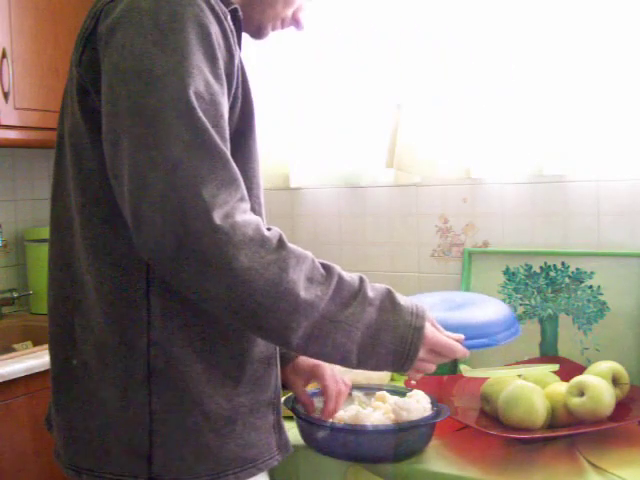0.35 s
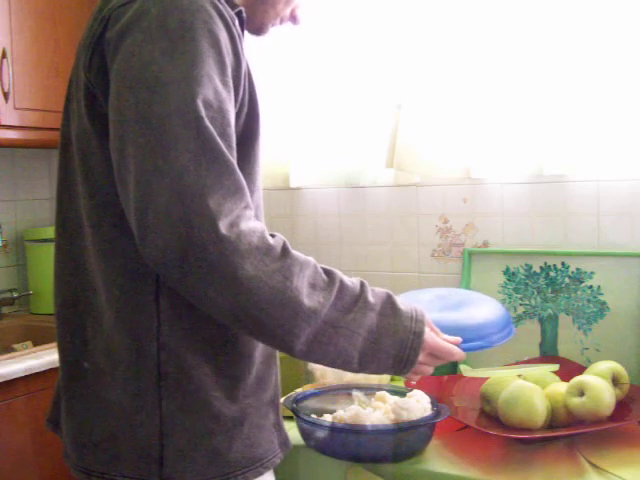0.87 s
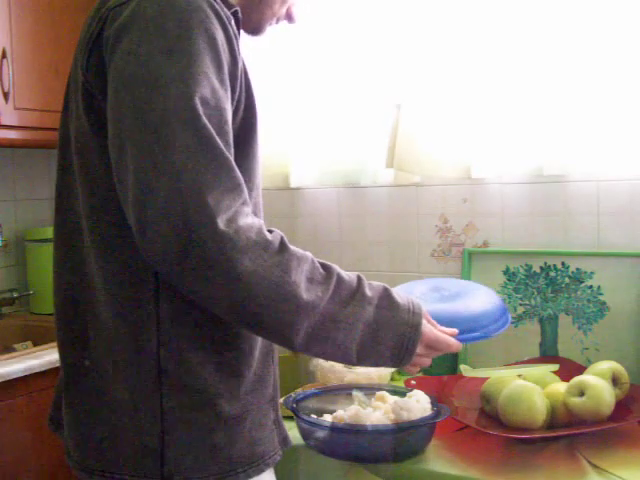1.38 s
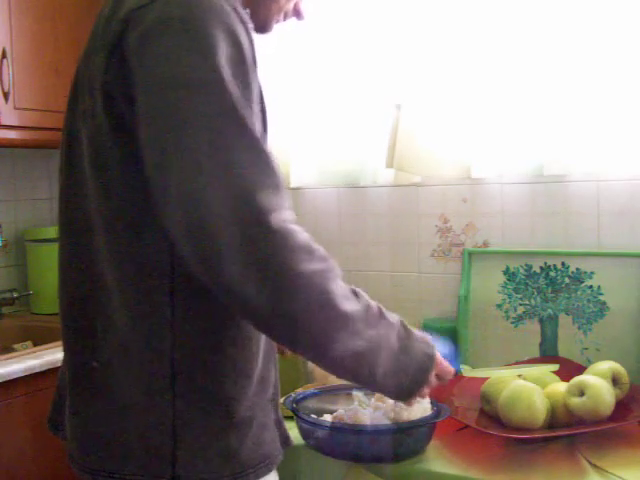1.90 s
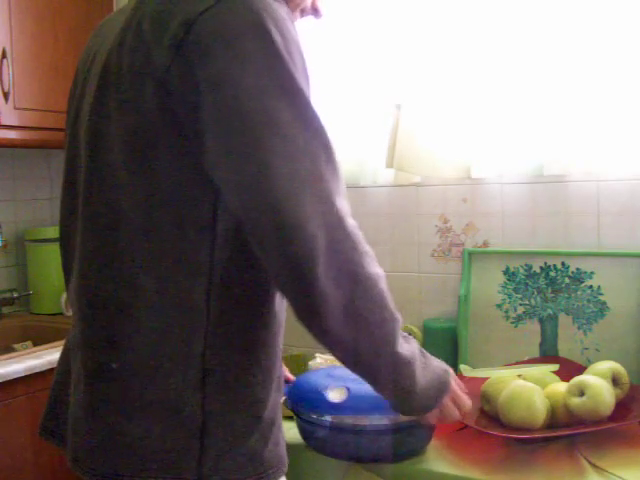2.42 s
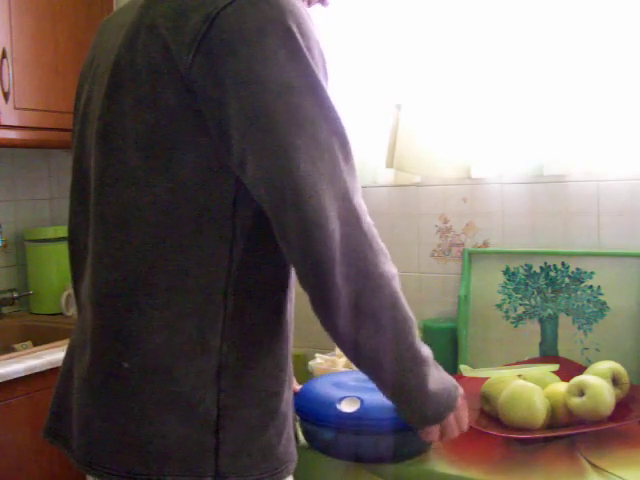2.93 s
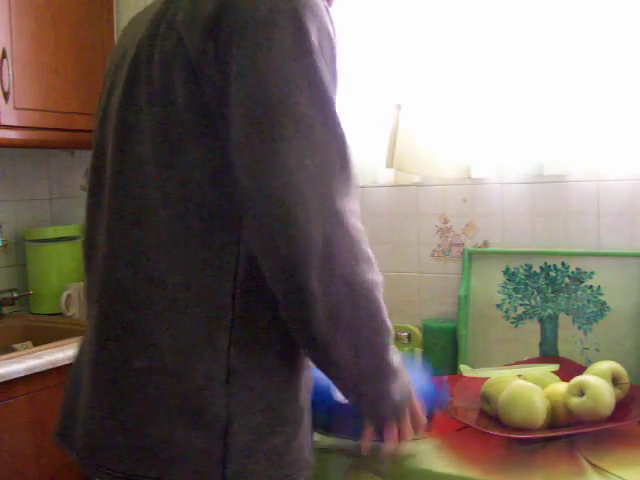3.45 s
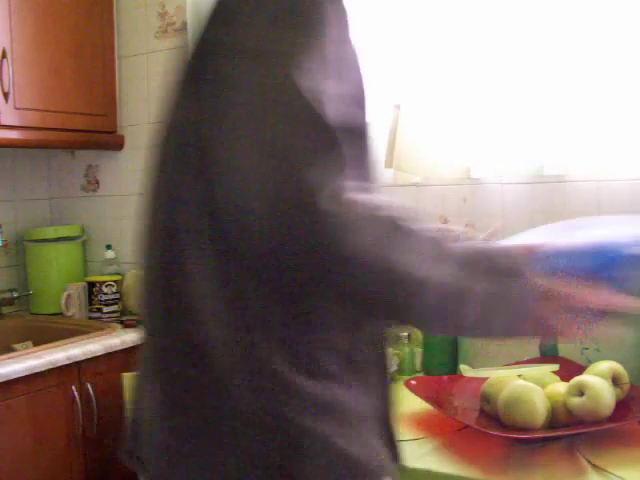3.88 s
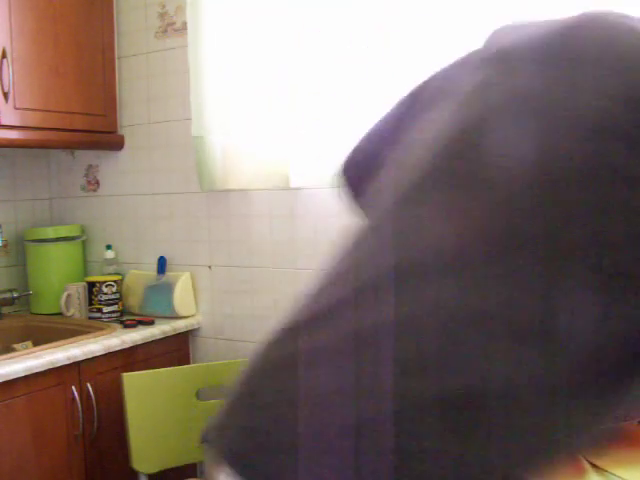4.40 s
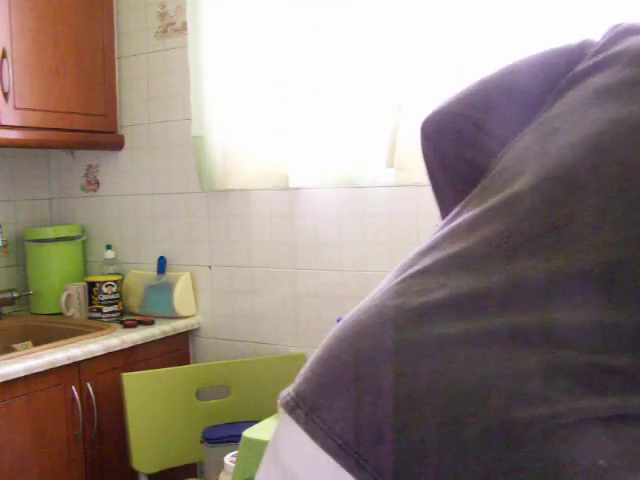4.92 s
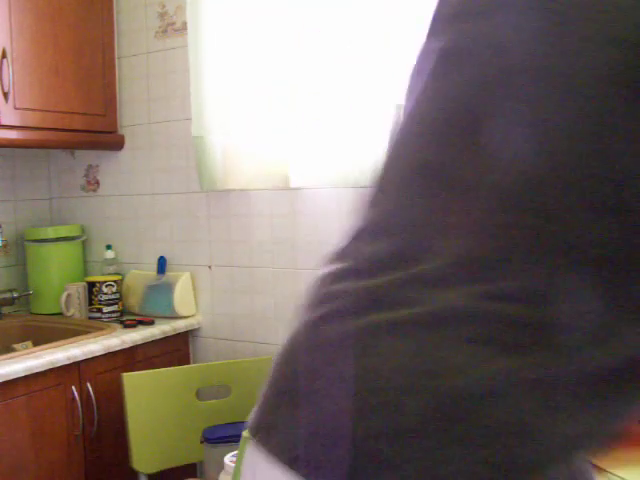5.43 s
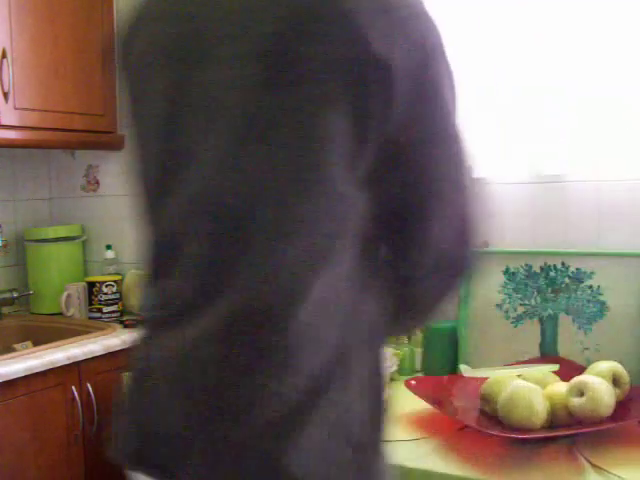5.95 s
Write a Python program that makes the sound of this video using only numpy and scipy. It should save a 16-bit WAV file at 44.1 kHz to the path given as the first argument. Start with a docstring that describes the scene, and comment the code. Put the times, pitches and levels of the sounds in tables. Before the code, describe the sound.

A wall clock ticks while a plastic lid snaps onto a bowl; cloth swishes, then the container drops with a loud, sharp clatter and rattle.

```python
"""Over a quiet floor a wall clock ticks each second; a plastic lid is pressed onto a bowl on a kitchen table,
then the bowl is carried off and dropped into a plastic box. Sleeves rustle and the bowl squeaks twice.
Blows and rubbing ring plastic modes, fibre clicks make the rustle, stick-slip the squeaks, gear shudder the ticks.
A tiled room rings; a small microphone with a dull top overloads on the hardest peaks."""
import sys
import numpy as np
from scipy import signal
from scipy.fft import rfft, irfft
from scipy.io import wavfile
from scipy.ndimage import uniform_filter1d

SR = 44100
rng = np.random.default_rng(int(sys.argv[2]) if len(sys.argv) > 2 else 0)


def pcm_store(signal):
    """Save signal as 16-bit PCM."""
    levels = np.round(np.clip(np.atleast_2d(signal), -1, 1) * 32767)
    wavfile.write(sys.argv[1], SR, levels.astype(np.int16).T)


def volts_from_db(level):
    """Convert decibel levels to linear amplitude ratios."""
    exponent = np.asarray(level, float) / 20
    return 10 ** exponent


N = 267422
T = np.arange(N) / SR

# blows on the plastic, levels relative within a column:
# start_s, hollow_thud_db, body_db, bright_crack_db, contact_scale (1 = 1.3 ms decay constant)
BLOWS = [(0.742, -37.5, -64, -64, 6.2), (1.08, -35.5, -63, -67, 22), (2.419, -23, -13.5, -16, 3),
         (2.537, -24, -25.5, -41, 15), (2.608, -31, -44, -25, 4.2), (2.639, -26, -21, -35.5, 6.6),
         (2.711, -40, -34.5, -20, 0.97), (2.792, -20.5, -30.5, -25, 4), (2.891, -17, -44, -41, 3.3),
         (3.184, -60, -45.5, -39.5, 3.2), (3.311, -31.5, -36, -47.5, 2.3), (3.327, -23.5, -39, -37.5, 6.3),
         (3.35, -32, -25.5, -36, 2.4), (3.731, -39.5, -46.5, -38, 6.6), (4.126, -46, -41, -33.5, 3.4),
         (4.167, -46, -32.5, -33, 8.9), (4.830, -13, -15.5, -8, 1.2), (4.844, -25, -34, -11.5, 0.7),
         (4.853, -36, -38, -29.5, 0.39), (5.008, -29, -29, -36, 2.8), (5.029, -18, -17.5, -6, 1.94),
         (5.036, -20, -25, -29, 3), (5.102, -38, -25, -22, 0.36), (5.129, -36, -26, -27, 0.61),
         (5.182, -35, -25, -36, 9), (5.236, -34, -31, -38.5, 0.89), (5.387, -47, -53, -42, 3.1),
         (5.669, -38.5, -46, -49.5, 19), (5.724, -63, -46.5, -39.5, 2.9), (5.765, -61, -41.5, -40.5, 1.4),
         (5.878, -64, -53, -44.5, 1.8), (5.999, -55, -35.5, -43, 13), (6.039, -55, -42, -40, 9.7)]
# presses, slides and jostles of the plastic; rise and fall are the times for 20 dB:
# peak_s, hollow_creak_db, bright_rattle_db, rise_s, fall_s
RUBS = [(2.429, -24.5, -28, 0.014, 0.033), (2.5, -35, -44, 0.093, .06), (2.549, -31.5, -41.5, 0.043, .03),
        (2.612, -33.5, -34.5, 0.0044, .05), (2.649, -25.5, -31, 0.036, 0.07),
        (2.727, -34, -30, 0.042, 0.028), (2.799, -34, -46, .02, 0.25), (2.89, -30.5, -49, 0.073, 0.086),
        (2.95, -27, -35.5, 0.074, 0.058), (3.089, -36, -53, .1, 0.06), (3.246, -59, -45.5, 0.27, 0.088),
        (3.33, -38, -42, 0.023, 0.06), (3.355, -32, -31.5, 0.018, 0.049), (3.959, -64, -34.5, 0.071, .07),
        (4.17, -47, -34.5, 0.077, .12), (4.37, -44, -36.5, 0.11, 0.088), (4.45, -52.5, -35.5, 0.085, 0.11),
        (4.843, -28.5, -28, 0.0069, 0.14), (4.889, -27, -32, 0.028, 0.034), (4.97, -56, -39.5, 0.13, .1),
        (5.022, -42, -31, 0.041, .04), (5.05, -31.5, -26, 0.029, 0.12), (5.102, -26.5, -23, 0.054, 0.098),
        (5.18, -46, -42, 0.054, 0.047), (5.223, -34, -36, 0.036, 0.12), (5.43, -52.5, -55, 0.13, 0.083)]


def unit(x):
    """Scale to rms 1."""
    return x / np.sqrt(np.mean(x ** 2))


def colour(x, points):
    """Shape a sound by (Hz, dB) points, straight in log frequency."""
    hz, db = np.transpose(points)
    f = np.maximum(np.fft.rfftfreq(len(x), 1 / SR), 1)
    gain_db = np.interp(np.log(f), np.log(hz), db, left=-90, right=-90)
    return irfft(rfft(x) * volts_from_db(gain_db), len(x))


def ring(x, hz, t60_s):
    """One decaying mode; an impulse of 1 rings with amplitude 1."""
    r = np.exp(-np.log(1000) / (t60_s * SR))
    w = 2 * np.pi * hz / SR
    return signal.lfilter([np.sin(w)], [1, -2 * r * np.cos(w), r * r], x)


def steady_norm(t60_s):
    """Level of a mode under steady noise; dividing by it evens long and short modes."""
    return np.sqrt(t60_s * SR / 28)


def grit(spread_db, share):
    """Tiny slips: a share of the samples carry a click of very uneven size."""
    size = volts_from_db(spread_db * rng.exponential(size=N))
    return unit(rng.standard_normal(N) * size * (rng.random(N) < share))


def walk(rate_hz):
    """Random levels joined by ramps 1 / rate_hz long; spread near 1."""
    hold = int(SR / rate_hz)
    steps = np.repeat(rng.standard_normal(N // hold + 1), hold)
    return 1.2 * uniform_filter1d(steps, hold)[:N]


def swells(rows, t=T):
    """Gain of summed swells (peak_s, level_db, rise_s, fall_s); rise and fall are the times for 20 dB."""
    rise_bend, fall_bend = 1.28, 1.09  # over 1 rounds the top and steepens the foot
    total = 0
    for peak_s, db, rise_s, fall_s in rows:
        before = (np.abs(peak_s - t) / rise_s) ** rise_bend
        after = (np.abs(t - peak_s) / fall_s) ** fall_bend
        total = total + volts_from_db(db - 20 * np.where(t < peak_s, before, after))
    return total


def strike(starts_s, gains, contact_scales):
    """Contacts rise quickly and die away over their contact time; the gain sets the energy."""
    x = np.zeros(N)
    for start_s, gain, scale in zip(starts_s, gains, contact_scales):
        t = np.arange(int(0.0087 * scale * SR)) / (0.0013 * scale * SR)
        shape = (1 - np.exp(-t / 0.24)) * np.exp(-t)
        at = int(start_s * SR)
        x[at:at + len(t)] += (gain * shape / np.sqrt(np.sum(shape ** 2)))[:N - at]
    return x


def plastic_modes():
    """Blows and rubbing excite the same modes; every blow lands on another spot and stirs another mix."""
    # modes of the plastic: pitch_hz, level_db, t60_s
    modes = [(130.8, -7.5, 0.17), (165.3, 0, 0.047), (210.6, -8.5, 0.13), (245, -4, 0.12),
             (286.6, -6, 0.062), (331.5, -7.5, 0.068), (393.3, -2, 0.058), (449.5, -5, 0.12),
             (490, -2, 0.058), (577.5, 1, 0.046), (675, -8, 0.052), (770, -3, 0.016), (901.5, -10, 0.045),
             (1034, -3.5, 0.019), (1118, -6, 0.017), (1265, -5.5, 0.0089), (1398, -9.5, 0.02),
             (1635, -1.5, 0.007), (1874, -5, 0.015), (2100, -5.5, 0.015), (2378, -4, 0.011),
             (3034, -1.5, 0.0047)]
    # pitch of the air hollow in whatever is being handled: time_s, pitch_hz
    hollow = [(.74, 517), (1.08, 245), (2.4, 530), (2.56, 483), (2.62, 372), (2.72, 363), (2.8, 302),
              (2.95, 206), (3.09, 344), (3.31, 190), (3.36, 450), (3.45, 300), (3.9, 350), (3.97, 500),
              (4.17, 500), (4.36, 396), (4.9, 394), (5.15, 397), (5.25, 285), (5.67, 490)]
    # weight coming down on table, floor and box: peak_s, level_db, rise_s, fall_s
    booms = [(2.694, -39.5, .1, 0.04), (2.83, -27, .06, .08), (2.944, -28.5, .05, 0.087),
             (3.116, -35.5, 0.11, .08), (3.325, -24.5, 0.024, .04), (3.36, -27, .03, 0.069),
             (4.168, -35, .03, 0.059), (4.258, -40, 0.062, 0.3), (4.852, -15, .015, 0.029),
             (4.89, -23.5, 0.025, .06), (5.03, -26, 0.073, .1), (5.155, -22, 0.052, 0.064),
             (5.213, -30.5, 0.037, 0.047)]
    boom_top_hz, hollow_top_hz = 150, 720
    hollow_fall_db_per_octave = 13
    scrape_db = -11  # relative to the mean of creak and rattle

    start_s, thud_db, body_db, _, contact_scale = np.transpose(BLOWS)
    spot = rng.standard_normal((len(start_s), len(modes)))
    hollow_s, pitch_hz = np.transpose(hollow)
    hollow_hz = np.exp(np.interp(T, hollow_s, np.log(pitch_hz)))
    creak = swells([(s, low, rise, fall) for s, low, _, rise, fall in RUBS])
    scrape = swells([(s, (low + top) / 2 + scrape_db, rise, fall) for s, low, top, rise, fall in RUBS])
    out = 0
    for k, (hz, db, t60_s) in enumerate(modes):
        if hz < hollow_top_hz:
            # the enclosed air favours the low modes near its own pitch
            away_db = hollow_fall_db_per_octave * np.abs(np.log2(hz / hollow_hz))
            hit_db = thud_db - np.interp(start_s, T, away_db)
            rub = swells(booms) if hz < boom_top_hz else creak * volts_from_db(-away_db)
        else:
            hit_db, rub = body_db + 5.5, scrape
        blows = strike(start_s, volts_from_db(hit_db + 2.3 * spot[:, k]), contact_scale)
        blows = blows * np.sign(rng.standard_normal(N))
        rubbing = rub / steady_norm(t60_s) * grit(spread_db=2.1, share=.5)
        out = out + volts_from_db(db) * ring(blows + rubbing, hz, t60_s)
    return out


def plastic_crackle():
    """Above its clear modes the plastic rings too densely to tell tones apart: shaped noise and clicks."""
    # spectrum of the dense ringing: pitch_hz, level_db (per Hz)
    crack_spectrum = [(500, -12.5), (1200, -18), (2200, -9.5), (3400, 1), (4800, 3.5), (6500, -3.5),
                      (9000, -7.5), (12000, -35.5)]
    start_s, _, _, crack_db, contact_scale = np.transpose(BLOWS)
    cracks = strike(start_s, volts_from_db(crack_db + 22.0), contact_scale) * np.sign(rng.standard_normal(N))
    rattle = swells([(s, top, rise, fall) for s, _, top, rise, fall in RUBS])
    rattle = rattle * volts_from_db(3.0 * walk(150)) * grit(spread_db=2.5, share=0.35)
    return volts_from_db(4.0) * colour(cracks + rattle, crack_spectrum)


def plastic():
    """Small light things move little air in the deep bass, so the sum is high-passed."""
    high_pass = signal.butter(4, 68, "high", fs=SR, output="sos")
    return signal.sosfilt(high_pass, plastic_modes() + plastic_crackle())


def squeak():
    """Slightly uneven stick-slip that speeds up a little: a fundamental with three overtones."""
    # a foot of the bowl drags: peak_s, level_db (before overtone levels), rise_s, fall_s, slip_rate_hz (at peak)
    squeaks = [(3.635, -51, 0.031, 0.088, 593.6), (4.172, -47, 0.064, .025, 784)]
    slip_hz_per_s = 150
    harmonics_db = (7.0, 2.0, 1, 3.5)
    out = 0
    for peak_s, db, rise_s, fall_s, hz in squeaks:
        slip_hz = (hz + slip_hz_per_s * (T - peak_s)) * (1 + 0.016 * walk(300))
        phase = 2 * np.pi * np.cumsum(slip_hz) / SR
        tone = sum(volts_from_db(d) * np.sin((k + 1) * phase) for k, d in enumerate(harmonics_db))
        out = out + swells([(peak_s, db, rise_s, fall_s)]) * volts_from_db(2.8 * walk(120)) * tone
    return out


def rustle():
    """Cloth fibres slip in dense tiny clicks, flickering in level."""
    # sleeves rubbing: peak_s, level_db, rise_s, fall_s
    rubs = [(1.74, -50.5, 0.068, 0.11), (1.85, -54, 0.094, .06), (2.31, -32.5, 0.17, .2),
            (3.645, -43, 0.23, .08), (3.715, -43.5, 0.062, 0.091), (3.93, -43, 0.16, .12),
            (4.128, -41.5, .006, .1), (4.35, -29, .12, 0.13), (4.42, -28.5, .1, .18), (4.7, -55, 0.12, .3),
            (5.5, -51, .2, .6), (5.73, -52.5, 0.19, .4), (6.03, -42.5, 0.16, .1)]
    # spectrum of the fibres: pitch_hz, level_db (per Hz, relative)
    cloth = [(120, -30), (200, -12.5), (390, -2), (430, 0.5), (465, -10), (908, -21.5), (1500, -16),
             (2050, -7), (2800, -8.5), (3500, -1.5), (4540, 2), (7090, -5), (9000, -8), (11700, -48),
             (19800, -120)]
    fibres = unit(colour(grit(spread_db=1.5, share=0.23), cloth))
    return swells(rubs) * volts_from_db(0.83 * walk(40)) * fibres


def clock():
    """Every second the gear train shudders, rattles and rings the case; starts 1 s ahead of the scene."""
    # modes of the case: pitch_hz, level_db (relative), t60_s
    case_modes = [(500, -4, 0.1), (598, -1, 0.072), (732, 0, 0.12), (1216, -5, 0.041), (1440, -4, 0.028),
                  (1950, -2.5, 0.029), (2070, -11.5, 0.056), (2750, -8, 0.0083), (3150, 6.5, 0.0067),
                  (3790, -2, 0.079), (4250, 2.5, 0.033), (4580, -1.5, 0.0082), (5080, 2, 0.025),
                  (5580, 6, 0.008), (6190, -3.5, 0.037), (6400, 3, 0.017)]
    # broad rattle of the case: pitch_hz, level_db (per Hz, relative)
    case_rattle = [(1200, -31), (1800, -4), (3000, -0.5), (6300, -3), (7000, -9), (9000, -7.5)]
    peak_s = .966  # within each second
    shudder_db, rise_s, fall_s = -32, 0.022, 0.038
    t = np.arange(-SR, N) / SR
    shudder = swells([(peak_s + k, shudder_db, rise_s, fall_s) for k in range(-1, N // SR)], t)
    out = shudder * unit(colour(rng.standard_normal(N + SR), case_rattle)) * volts_from_db(-0.5)
    for hz, db, t60_s in case_modes:
        push = shudder * rng.standard_normal(N + SR)
        out = out + volts_from_db(db - 12.5) * ring(push, hz, t60_s) / steady_norm(t60_s)
    return out


def room():
    """Tiled walls: a dense tail of noise bands, each dying at its own rate; the upper middle lasts longest."""
    # decay of the room: pitch_hz, t60_s
    decay = [(100, 0.29), (400, 0.31), (1500, 0.41), (4000, 0.36), (8000, 0.3)]
    t = np.arange(SR) / SR
    hz, t60_s = np.transpose(decay)
    tail = 0
    for f in 60 * 2 ** np.arange(0, 7.6, .5):
        band_shape = [(f / 2 ** .5, -40), (f / 2 ** 0.24, -3), (f, 0), (f * 2 ** 0.2, -3), (f * 2 ** .5, -40)]
        band = colour(rng.standard_normal(SR), band_shape)
        tail = tail + band * 10 ** (-3 * t / np.interp(np.log(f), np.log(hz), t60_s))
    tail = tail * (1 - np.exp(-t / 0.0012))
    return tail / np.sqrt(np.sum(tail ** 2))


def air():
    """The steady floor of the kitchen, a far drone, and the slow sway under it: three shaped noises."""
    # spectrum of the floor: pitch_hz, level_db (per Hz, relative)
    floor_spectrum = [(24, -33.5), (40, -6.5), (124, 1), (251, -6.5), (395, -7), (554, -8), (664, -12.5),
                      (1070, -14.5), (2590, -18), (6700, -23.5), (8040, -19), (9000, -34.5), (11700, -78.5),
                      (19800, -120)]
    # slow push of air and floor as the body moves: peak_s, level_db, rise_s, fall_s
    sway_swells = [(2.11, -49, .25, .4), (4.25, -44, 0.18, 0.42), (5.35, -48, 0.32, .4)]
    # a far-off mid drone swells once: peak_s, level_db, rise_s, fall_s
    drone_swell = (1.5, -52.5, 2, 3)
    floor_db, drone_rest_db, sway_rest_db = -49, -65.5, -62
    sway_spectrum = [(15, -6.5), (29, -4.0), (45, -21.0)]
    drone_spectrum = [(150, -27.0), (300, -2), (550, -3.5), (1000, -4.5), (1400, -12.5)]

    drift = volts_from_db(floor_db + .5 * walk(3))
    hush = drift * unit(colour(rng.standard_normal(N), floor_spectrum))
    sway = unit(colour(rng.standard_normal(N), sway_spectrum))
    drone = unit(colour(rng.standard_normal(N), drone_spectrum))
    hush = hush + (swells([drone_swell]) + volts_from_db(drone_rest_db)) * drone
    return hush + (swells(sway_swells) + volts_from_db(sway_rest_db)) * sway


def scene():
    """Near sources with the tail of the place they sound from; the far clock carries a little more room."""
    # the work moves from the table across the room to the box: change_s
    moves_s = [3.5, 4.7]
    near_room_db, clock_room_db = -5, -3.5
    near = plastic() + rustle() + squeak()
    place = np.digitize(T, moves_s)
    walls = sum(signal.fftconvolve(near * (place == k), room())[:N] for k in range(len(moves_s) + 1))
    ticks = clock()
    far = ticks + volts_from_db(clock_room_db) * signal.fftconvolve(ticks, room())[:N + SR]
    return (near + volts_from_db(near_room_db) * walls + far[SR:] + air())[None]


def top_cut(x):
    """Nothing passes above the cut-off."""
    return signal.sosfilt(signal.butter(12, 16830, fs=SR, output="sos"), x)


def record(dry):
    """The microphone loses the top, then the input overloads on the hardest peaks."""
    clip = .7  # of full scale
    low_pass = signal.cheby2(8, 65, 10200, fs=SR, output="sos")
    dull = signal.sosfilt(low_pass, dry)
    mix = np.clip(dull, -clip, clip)
    return top_cut(mix)


dry = scene()
out = record(dry)
pcm_store(out)
```